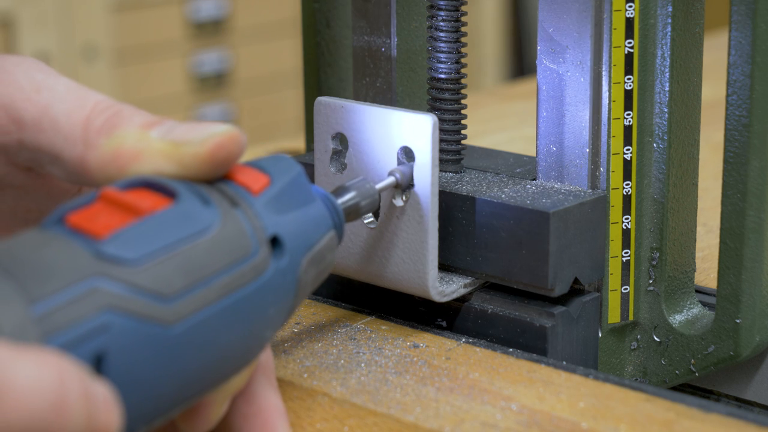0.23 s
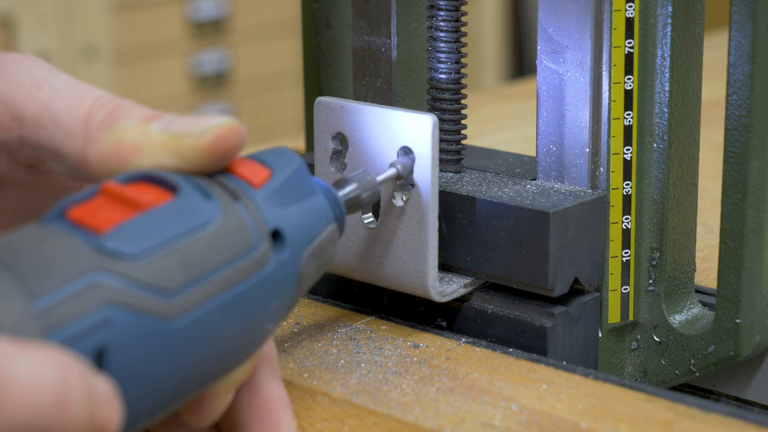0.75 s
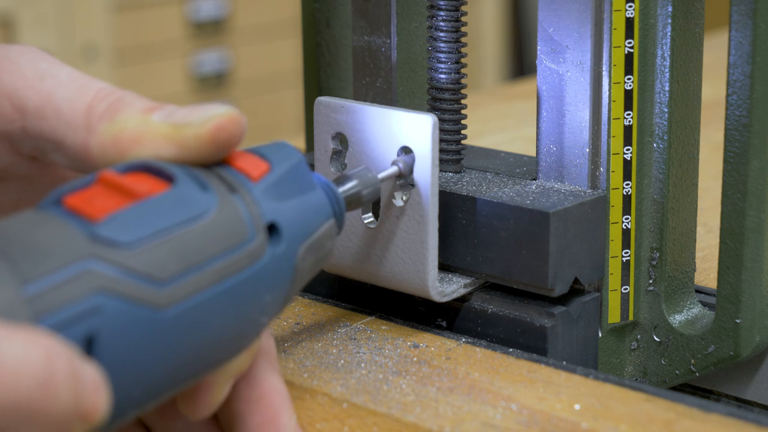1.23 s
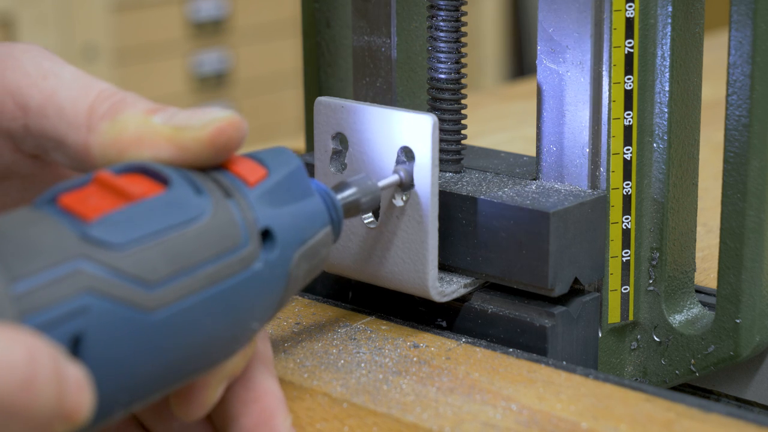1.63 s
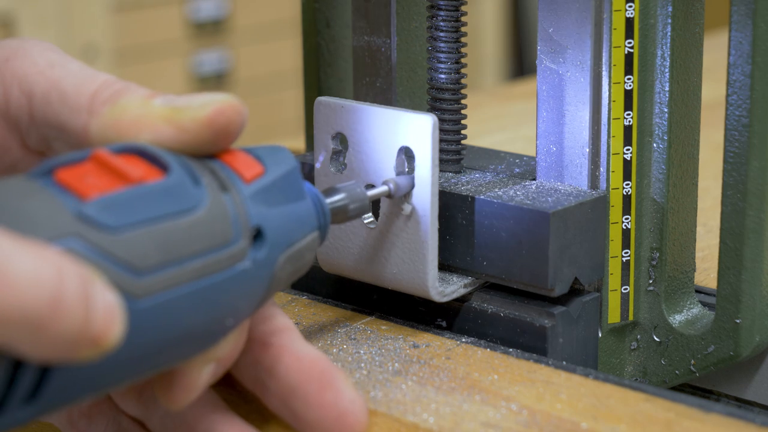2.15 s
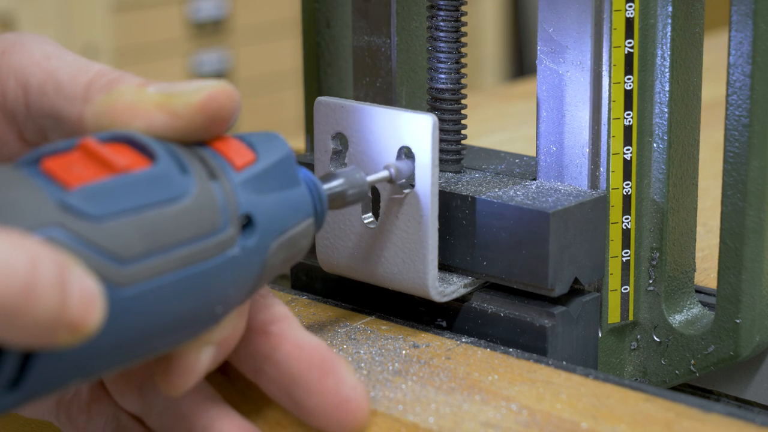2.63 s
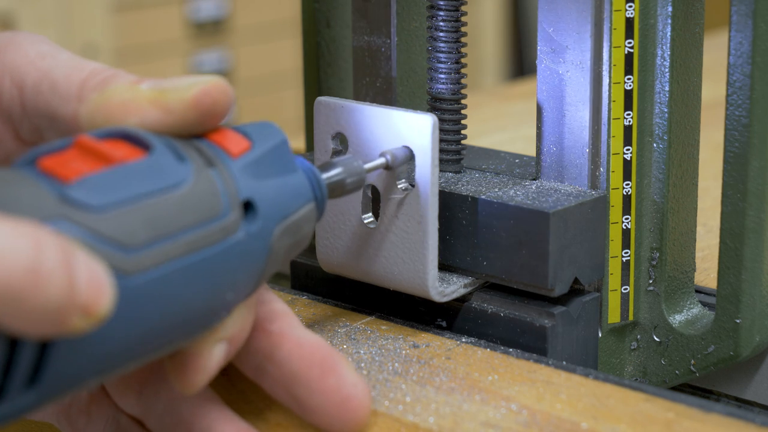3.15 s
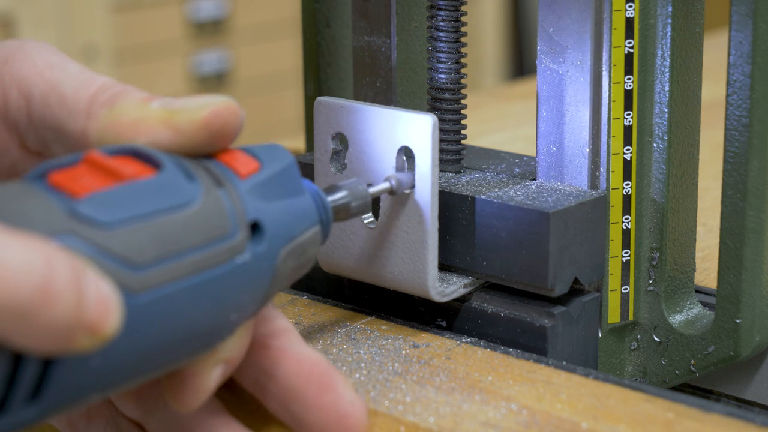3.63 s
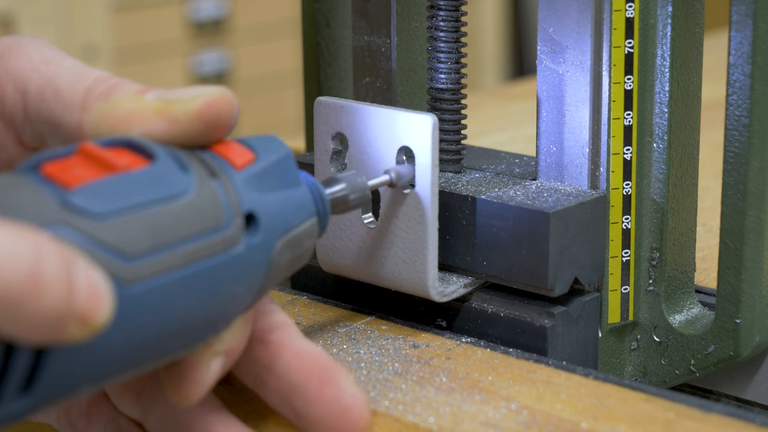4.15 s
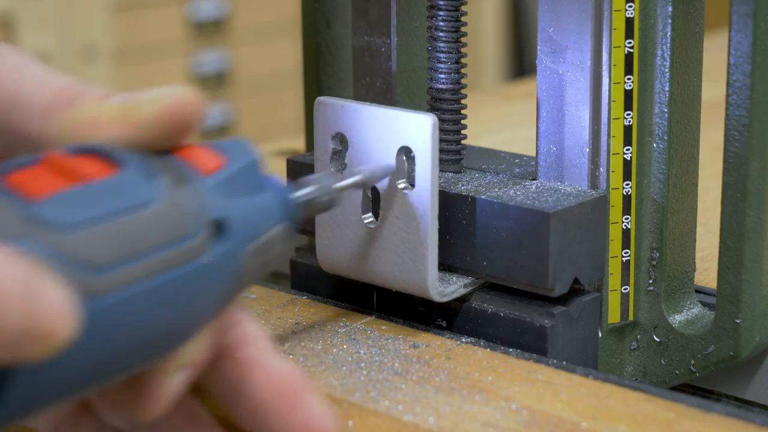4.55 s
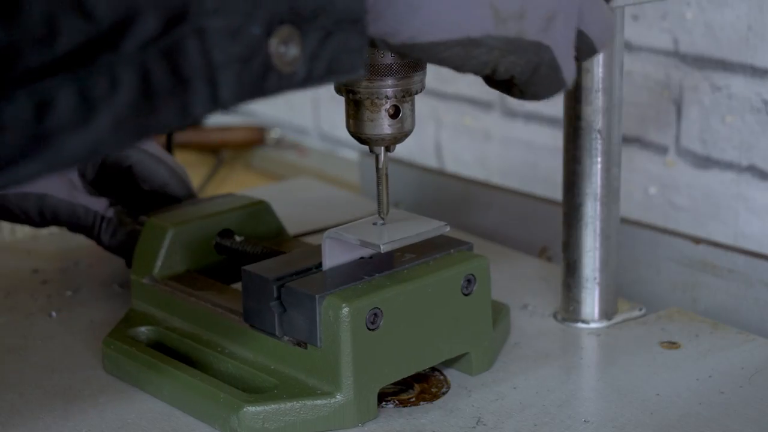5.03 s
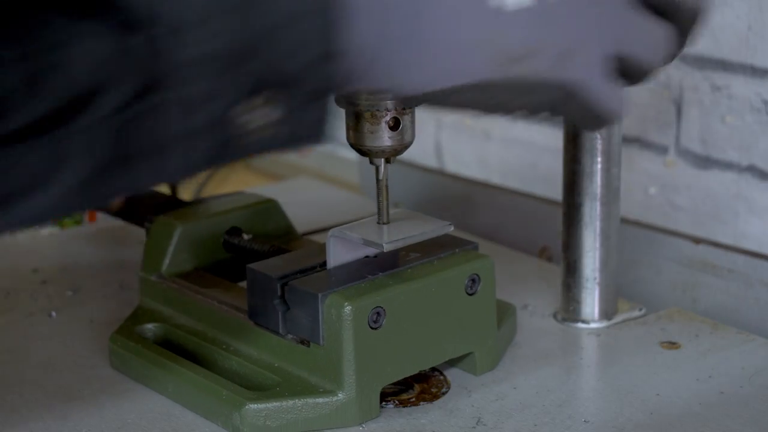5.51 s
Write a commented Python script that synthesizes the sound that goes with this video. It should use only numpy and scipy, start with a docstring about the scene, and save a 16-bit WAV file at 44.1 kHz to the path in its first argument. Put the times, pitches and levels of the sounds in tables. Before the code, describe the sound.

A small rotary tool whines and rasps inside a metal bracket, chattering and squealing, then cuts off to near silence with faint cloth rustle and ticks.

```python
"""A small cordless rotary tool widens a hole in a metal bracket clamped in a vice, close to the microphones.
From 0 s: one shaft speed drives tonal motor whine, fan noise, rasping chips, bracket chatter and squeals.
The motor sags under load; the burr lifts briefly at times; the grinding ends abruptly at 4.74 s.
Then, very quietly, sleeve and glove brush over a bench drill: filtered grit, knocks, faint squeaks, small ticks.
Quiet workshop air, shaped noise, lies under everything."""
import sys
import numpy as np
from scipy import signal
from scipy.fft import rfft, irfft
from scipy.io import wavfile

SR = 44100
rng = np.random.default_rng(int(sys.argv[2]) if len(sys.argv) > 2 else 0)


def generate_wav(sig):
    """Save sig (samples, or channels by samples) to the path in sys.argv[1] as 16-bit PCM at SR."""
    pcm = np.round(np.clip(np.atleast_2d(sig).T, -1, 1) * 32767).astype(np.int16)
    wavfile.write(sys.argv[1], SR, pcm)


N = 254898
T = np.arange(N) / SR
HZ = np.fft.rfftfreq(N, 1 / SR)
USUAL_HZ = 560  # reference shaft speed


def gain_of(db):
    """Decibels to amplitude."""
    return 10 ** (np.asarray(db) / 20)


def evened(x):
    """Scales to rms 1."""
    return x / np.sqrt(np.mean(x ** 2) + 1e-20)


def curves(rows):
    """Table columns, joined by straight lines in time."""
    s, *columns = np.transpose(rows)
    return [np.interp(T, s, c) for c in columns]


def shape(points):
    """Gain at every frequency from (f/Hz, level/dB) points."""
    hz, db = np.transpose(points)
    return gain_of(np.interp(np.log(HZ + 1), np.log(hz + 1), db))


def colour(x, gain):
    """Filters by a gain for every frequency."""
    return irfft(rfft(x) * gain, N)


def above(hz, order=8):
    """Gain of a steep high-pass."""
    ratio = (HZ / hz) ** order
    return ratio / np.sqrt(1 + ratio ** 2)


def mode(hz, width):
    """Response of one resonance, gain 1 at its top."""
    return 1j * HZ * width / (hz ** 2 - HZ ** 2 + 1j * HZ * width)


def noise():
    """White noise of nominal rms 1."""
    return rng.standard_normal(N)


def wander(hz):
    """Slow chance of rms 1, up to about hz changes a second."""
    return evened(colour(noise(), 1 / (1 + (HZ / hz) ** 2)))


def swell(start, end, fade):
    """A window in time with soft edges."""
    return np.sin(np.pi / 2 * np.clip(np.minimum(T - start, end - T) / fade, 0, 1))


def dying(start, decay_s):
    """A sudden start and an exponential decay."""
    return (T >= start) * np.exp(-np.maximum(T - start, 0) / decay_s)


def grit(per_s, spread_db):
    """Tiny random impulses of very unequal size, rms 1."""
    size = gain_of(spread_db * np.minimum(rng.exponential(1, N), 4))
    return evened(np.sign(noise()) * size * (rng.random(N) < per_s / SR))


def echoes(t60):
    """Response of sparse, dying reflections of energy 1."""
    taps = noise() * (rng.random(N) < 2000 / SR) * gain_of(-60 * T / t60)
    return rfft(taps / np.linalg.norm(taps))


def partial(turns, multiple, rough, width_hz):
    """One multiple of a rotation; the rough share of its power is smeared by uneven contact."""
    angle = 2 * np.pi * (multiple * turns + rng.random())
    rough = np.clip(rough, 0, 1)
    smeared = wander(width_hz) * np.cos(angle) + wander(width_hz) * np.sin(angle)
    return np.sqrt(2 * (1 - rough)) * np.cos(angle) + np.sqrt(rough) * smeared


# workshop air, relative spectrum: f/Hz, density/dB per Hz
AIR = [(60, -30), (280, -6.5), (600, -4), (1300, -13.5), (4000, -17.5), (9000, -25.5), (12000, -49.5)]


def air():
    """Steady shaped noise, the quiet air of the workshop."""
    return gain_of(-91.5) * evened(colour(noise(), shape(AIR)))


# abrupt pops: t/s, peak level/dB
POPS = [(1.94, -41), (4.74, -77)]


def pops():
    """Single one-sided pulses, each a step up and a very fast decay."""
    return sum(gain_of(db) * dying(s, decay_s=0.00018) for s, db in POPS)


# small metal ticks: t/s, approximate peak level/dB, low-pass f/Hz
TICKS = [(5.558, -59, 14000), (5.571, -53.5, 14000), (5.577, -66, 14000), (5.684, -76, 3490),
         (5.753, -70, 3940)]
# tick spectrum before low-pass: f/Hz, relative level/dB
TICK = [(600, -22), (1100, -12), (2100, 1), (4000, 3), (5300, -7), (8800, 1), (12000, -25), (15000, -60)]


def ticks():
    """Short decaying noise cracks, some bright and some dull."""
    out = 0
    for s, db, top_hz in TICKS:
        crack = evened(colour(noise(), shape(TICK) * (1 - above(top_hz, order=4))))
        out = out + gain_of(db - 12.5) * dying(s, decay_s=0.0051) * crack  # rms below peak
    return out


# strokes of sleeve and glove: start t/s, length/s, level/dB
STROKES = [(4.767, 0.12, -76), (4.896, 0.092, -67.5), (4.962, 0.12, -76), (5.068, 0.1, -86.5),
           (5.147, 0.093, -76.5), (5.317, 0.12, -72.5), (5.444, 0.072, -65.5), (5.56, 0.044, -73.5)]
STROKE_RISE_S, STROKE_FALL_S, SETTLE_DB, SETTLE_S, FOLDS_DB = 0.03, 0.03, -16, 0.092, -3
# soft knocks of the arm against the drill: t/s, level/dB before the rise and decay
KNOCKS = [(4.774, -68), (4.8, -65.5), (5.346, -61.5), (5.417, -58.5), (5.519, -60.5), (5.534, -69),
          (5.561, -75)]
KNOCK_RISE_S, KNOCK_DECAY_S = 0.0065, 0.019


def handling_levels():
    """Strokes rise, fade and let the cloth settle; folds bump along with them and at each knock."""
    power = 0
    for s, length, db in STROKES:
        stroke = np.clip(np.minimum((T - s) / STROKE_RISE_S, (s + length - T) / STROKE_FALL_S), 0, 1)
        settling = gain_of(SETTLE_DB) * dying(s + length / 2, SETTLE_S)
        power = power + (gain_of(db) * (stroke + settling)) ** 2
    knocks = sum(gain_of(db) * np.clip((T - s) / KNOCK_RISE_S, 0, 1) * dying(s, KNOCK_DECAY_S)
                 for s, db in KNOCKS)
    brushing = np.sqrt(power)
    return brushing, np.hypot(gain_of(FOLDS_DB) * brushing, knocks)


# feed lever squeaks: start t/s, end t/s, f/Hz, level/dB
SQUEAKS = [(4.771, 4.861, 1397, -79.5), (5.1, 5.167, 2630, -87)]


def lever_squeaks():
    """Faint squeaks of the feed lever: single tones, almost wholly smeared."""
    return sum(gain_of(db) * swell(start, end, fade=.025)
               * partial(hz * T, 0.99, rough=0.94, width_hz=48)  # sounds at 0.99 of the listed f
               for start, end, hz, db in SQUEAKS)


# cloth brushing spectrum: f/Hz, relative level/dB
BRUSH = [(250, -40), (560, 3), (900, -9), (1220, -12), (2700, -13), (4500, -26), (9000, -41), (13000, -72)]
# fold bump spectrum: f/Hz, relative level/dB
BUMP = [(60, -56), (130, -22), (275, 5), (400, -1), (600, -11), (1200, -58)]


def sleeve():
    """Cloth fibres catch and slip as grit through drill-head modes; folds bump softly, the lever squeaks."""
    brushing, bumping = handling_levels()
    housing = 1 + 3.5 * mode(1220, 70) + 0.99 * mode(1500, 80) + mode(2030, 90)
    brush = brushing * evened(colour(grit(per_s=2500, spread_db=1.0), shape(BRUSH) * housing))
    bump = bumping * evened(colour(grit(per_s=540, spread_db=1.0), shape(BUMP)))
    return (brush + bump + lever_squeaks()) * (T > 4.774)


# workshop reflections: f/Hz, level/dB re direct sound (mid adds 2 dB)
WIDTH = [(300, -31), (600, -36.5), (1100, -12.5), (2200, -10), (4500, -10), (8000, -14.5), (12000, -35)]


def bench(x):
    """The workshop answers each microphone differently; the bracket beams its upper middle to the left."""
    x = colour(x, above(150, order=3))  # small parts radiate no bass
    mid = x + colour(x, gain_of(2.0) * echoes(t60=0.35) * shape(WIDTH))
    side = colour(x, echoes(t60=0.6) * shape(WIDTH) + .17 * mode(4300, 1200).real)
    return np.array([mid + side, mid - side])


# shaft speed, sagging under hand pressure, recovering on lift: t/s, f/Hz
SPEED = [(0, 558.2), (.51, 518.6), (.79, 510.3), (.93, 556.8), (1.05, 538.4), (1.16, 535.3), (1.34, 595.3),
         (1.43, 608.2), (1.52, 560), (1.92, 551.3), (2.01, 534), (2.28, 534), (2.4, 565.9), (3.03, 572),
         (3.21, 606.6), (3.36, 564.4), (3.51, 586), (4.05, 584.7), (4.31, 603), (4.55, 547), (4.62, 587.7),
         (4.73, 609)]


def shaft_speed():
    """Shaft speed in Hz with a slight random waver."""
    return curves(SPEED)[0] * (1 + .002 * wander(25))


# free-running motor: multiple of shaft speed, mean level/dB at 600 Hz
MOTOR = [(3, -68.5), (4, -81), (5, -73.5), (7, -64), (9, -65.5), (12, -73), (15, -77), (21, -78)]
# bearing, between whole multiples: multiple of shaft speed, level/dB at 600 Hz
BEARING = [(2.11, -71.5), (5.11, -63.5), (7.11, -65)]
# cooling fan spectrum: f/Hz, relative density/dB per Hz
FAN = [(100, -44), (250, -34.5), (450, -28.5), (700, -13.5), (1400, -12.5), (2000, 1.5), (4300, -9.5),
       (5500, -19), (15500, -17.5)]
FAN_DB = -56.5  # at 600 Hz
WHINE_DB_PER_HZ, WHINE_ROUGH, WHINE_CLEARS_PER_HZ = 0.11, 0.49, 0.011  # louder, cleaner with speed


def motor(turns, speed, hum_db):
    """The unbalanced shaft hums with its octave; commutator and bearing whine, the fan blows with speed^4."""
    hum = gain_of(hum_db - 5.0) * partial(turns, 1, rough=0.17, width_hz=16)
    octave = gain_of(-72.0 + 5.9 * np.tanh(wander(5.0))) * partial(turns, 2, rough=0.051, width_hz=5.8)
    whine_rough = WHINE_ROUGH - WHINE_CLEARS_PER_HZ * (speed - USUAL_HZ)
    commutator = sum(gain_of(db + 3.2 * np.tanh(wander(5.7)))
                     * partial(turns, round(k), whine_rough, width_hz=12 * k) for k, db in MOTOR)
    bearing = sum(gain_of(db) * partial(turns, k, whine_rough, width_hz=35) for k, db in BEARING)
    whine = (commutator + bearing) * gain_of(WHINE_DB_PER_HZ * (speed - 600.0))
    fan = gain_of(FAN_DB) * evened(colour(noise(), shape(FAN)))
    return hum + octave + whine + fan * (speed / 600) ** 4


# chatter bouts, burr bouncing round the hole: start t/s, end t/s, nominal knock level/dB,
# hum level/dB (motor takes off 5), coarse scrape level/dB, bounces per turn
BOUTS = [(-.04, 0.107, -70, -84.5, -51, 1), (0.821, 0.968, -72.5, -64, -51.5, 0.84),
         (1.209, 1.302, -64, -58.5, -52.5, 0.91), (1.423, 1.619, -62.5, -66.5, -53, 0.91),
         (1.581, 1.956, -65.5, -53, -53, 0.94), (2.468, 2.802, -65.5, -59, -64.5, 1.0),
         (2.758, 3.1, -62, -63.5, -69, 0.9), (3.208, 3.323, -72.5, -69, -56.5, .9),
         (3.392, 3.552, -65, -70, -53.5, 0.96), (3.659, 4.32, -64, -59, -68, .83),
         (4.414, 4.569, -73.5, -64.5, -57.5, 0.99)]
BOUT_FADE_S, EVEN_BOUNCES = .04, 1
# between bouts: (nominal dB at usual speed, dB per Hz of sag)
CALM_KNOCK, CALM_HUM, CALM_SCRAPE = (-75, -0.09), (-65.5, -0.11), (-60, -0.012)


def shaking(sag_hz):
    """Hum, knock and scrape in dB, and bounces per turn: calm under pressure, bouts add in power."""
    knock, hum, scrape = (gain_of(db + per_hz * sag_hz)
                          for db, per_hz in (CALM_KNOCK, CALM_HUM, CALM_SCRAPE))
    per_turn = EVEN_BOUNCES
    for start, end, knock_db, hum_db, scrape_db, bounces_per_turn in BOUTS:
        on = swell(start, end, BOUT_FADE_S)
        knock = np.hypot(knock, on * gain_of(knock_db))
        hum = np.hypot(hum, on * gain_of(hum_db))
        scrape = np.hypot(scrape, on * gain_of(scrape_db))
        per_turn = per_turn + on * (bounces_per_turn - per_turn)
    return 20 * np.log10([hum, knock, scrape]), per_turn


def bounces(mean_rate):
    """The burr strikes the hole's wall about once a turn; the rate wavers, strong and weak blows alternate."""
    rate = mean_rate * (1 + .036 * wander(14) + .032 * wander(130))
    count = np.floor(np.cumsum(rate) / SR)
    alternation = 1 + .35 * np.tanh(wander(12)) * (-1) ** count
    force = gain_of(1.8 * noise() + 2.2 * wander(60)) * alternation
    return (np.diff(count, prepend=0) > 0) * force


# clamped bracket modes: f/Hz, width/Hz, relative level/dB
BRACKET = [(576, 170, -16.5), (677, 150, -5), (846, 30, 4.5), (1073.6, 7.4, 2.5), (1487, 140, -9.5),
           (2000, 96, -4), (3640, 160, -10.5)]


def chatter(hits, knock_db):
    """Bounces ring the bracket modes, less so when chatter is weak; scraping noise rings one broad mode."""
    body = sum(gain_of(db) * mode(hz, width) for hz, width, db in BRACKET)
    bouncing = 1 / (1 + gain_of(2 * (-65.0 - knock_db)))
    knocks = gain_of(8.5) * bouncing * evened(colour(hits, body * above(330)))
    ringing = gain_of(-1.5) * evened(colour(noise(), mode(1085.3, 79) ** 2))
    return gain_of(knock_db) * (knocks + ringing)


# squeals: start t/s, end t/s, multiple of shaft speed (rounded to halves), level/dB,
# second multiple (rounded to wholes), level/dB, left minus right/dB
SQUEALS = [(0.065, 0.489, 7, -48, 8, -55.5, 2.5), (0.443, 0.829, 10, -56.5, 15, -62.5, 5),
           (0.455, 0.747, 8, -65.5, 7, -72, 8), (0.715, 0.853, 7, -53, 8, -51.5, 4),
           (0.915, 1.205, 7, -49, 8, -56, 2.5), (1.964, 2.323, 8, -59.5, 10, -61, 6.5),
           (1.976, 2.28, 5, -58.5, 4, -67.5, -1), (2.263, 2.46, 7, -60.5, 8, -63.5, 8),
           (3.223, 3.431, 8, -57.5, 6, -59, 7), (3.234, 3.468, 1.5, -66.5, 4, -65, -1.5),
           (4.332, 4.48, 4, -54.5, 6, -55.5, 3), (4.327, 4.487, 8, -64, 9, -71, 9),
           (4.485, 4.587, 7, -50.5, 9, -52, 6)]
SQUEAL_OCTAVE_DB, SIDEBAND_DB, SIDEBAND_DB_PER_STEP = -15.5, -69.5, -1


def squeals(turns):
    """Stick-slip locks onto rotation: two fluttering tones in rough skirts, octave, sidebands a turn apart."""
    out = np.zeros((2, N))
    for start, end, multiple, db, second, second_db, pan_db in SQUEALS:
        k, k2 = round(2 * multiple) / 2, round(second)
        tones = 0
        for m, level in ((k, db), (k2, second_db)):
            core = .8 * partial(turns, m, rough=.15, width_hz=40)
            skirt = .6 * partial(turns, m, rough=1, width_hz=130)
            tones = tones + gain_of(level) * (core + skirt)
        octave = gain_of(db + SQUEAL_OCTAVE_DB) * partial(turns, 2 * k, rough=0.54, width_hz=53)
        once_a_turn = sum(2 * gain_of(SIDEBAND_DB + SIDEBAND_DB_PER_STEP * step)
                          * np.cos(2 * np.pi * (step * turns + rng.random()))
                          for step in range(1, 4) if k - step > 2)
        sidebands = once_a_turn * partial(turns, k, rough=0.24, width_hz=22)
        pan = gain_of([[pan_db / 2], [-pan_db / 2]])
        out += (tones + octave + sidebands) * swell(start, end, fade=0.039) * pan
    return colour(out, above(400, order=3))


# bite of the teeth, as fine-chip level before lifts: t/s, nominal level/dB
BITE = [(0.0, -54), (.45, -56), (.7, -51), (.9, -56), (1.5, -54.5), (1.9, -55.5), (1.97, -51.5),
        (2.25, -55), (2.42, -52.5), (3.05, -56.5), (3.25, -53), (4.25, -55), (4.4, -53), (4.73, -61.5)]
USUAL_BITE_DB = -55
# burr off the metal: start t/s, end t/s, drop of the fine chips/dB
LIFTS = [(1.255, 1.428, 4.5), (2.79, 2.851, 5), (3.089, 3.223, 9), (3.449, 3.531, 5.5),
         (4.104, 4.176, 10.5), (4.57, 4.804, 6.5)]
LIFT_FADE_S = 0.037
SCRAPE_OF_LIFT, RASP_OF_LIFT = 0.88, 0.68  # shares of a lift's drop
RASP_DB, RASP_OF_BITE, RASP_DB_PER_HZ = -55, 0.3, 0.013  # usual level, share of bite, rise with sag


def cut_levels(sag_hz, scrape_db):
    """Scrape, rasp and fizz in dB: pressure and bite add rasp; all three drop when the burr lifts."""
    bite_db = curves(BITE)[0]
    lift_db = sum(db * swell(start, end, LIFT_FADE_S) ** 2 for start, end, db in LIFTS)
    rasp_db = RASP_DB + RASP_OF_BITE * (bite_db - USUAL_BITE_DB) + RASP_DB_PER_HZ * sag_hz
    tremor_db = 1.0 * wander(29)  # the hand is never quite steady
    levels_db = [scrape_db - SCRAPE_OF_LIFT * lift_db, rasp_db - RASP_OF_LIFT * lift_db, bite_db - lift_db]
    return np.array(levels_db) + tremor_db


# scraping spectrum: f/Hz, relative level/dB
SCRAPE = [(700, -3.5), (1400, -11), (2000, -3), (3750, -4), (5130, -1), (6000, -9.5), (8500, -8.5),
          (10500, -15.5), (12600, -18.5), (14300, -16), (15700, -10.5)]
# burr and shank modes: f/Hz, width/Hz, relative level/dB
SHANK = [(7480, 210, -7.5), (9696, 400, -0.5), (9740, 54, 1), (11420, 400, -8)]


def cutting(turns, hits, knock_db, scrape_db, rasp_db, fizz_db):
    """Teeth tear off chips in a pattern partly repeating each turn; a bouncing burr cuts in bursts."""
    loose = np.clip((knock_db + 76.0) / 22, 0, .55)
    bursts = evened(signal.lfilter([1], [1, -np.exp(-1 / (0.00042 * SR))], np.sign(hits)))
    contact = np.sqrt(1 - loose + loose * bursts ** 2) * gain_of(np.tanh(wander(47)))
    # each multiple comes and goes as the burr finds new edges
    teeth = evened(sum(partial(turns, k, rough=.9, width_hz=22 + 4 * k) * gain_of(3 * np.tanh(wander(5)))
                       for k in range(2, 28)))
    chips = grit(per_s=30000, spread_db=2.1)
    regular = .42 - .45 * loose
    tearing = np.sqrt(1 - regular) * chips + np.sqrt(regular) * teeth
    drive = colour(tearing * contact, shape(SCRAPE))
    scrape = evened(colour(drive, above(1200, order=4) * (1 - above(4230))))
    rasp = evened(colour(drive, above(3780) * (1 - above(8500))))
    fizz = evened(colour(drive, above(9640)))
    rings = sum(gain_of(db) * mode(hz, width) ** 2 for hz, width, db in SHANK)
    shank = evened(colour(grit(per_s=18000, spread_db=6.0) * contact, rings))
    return (gain_of(scrape_db) * scrape + gain_of(rasp_db) * rasp
            + gain_of(fizz_db - 0.5) * fizz + gain_of(fizz_db - 3.5) * shank)


STOP_S = 4.741


def scene():
    """One shaft speed drives motor, cut, chatter and squeals; quiet handling follows."""
    speed = shaft_speed()
    sag_hz = USUAL_HZ - speed
    (hum_db, knock_db, scrape_db), per_turn = shaking(sag_hz)
    turns = np.cumsum(speed) / SR
    hits = bounces(speed * per_turn)
    cut = cutting(turns, hits, knock_db, *cut_levels(sag_hz, scrape_db))
    tool = motor(turns, speed, hum_db) + cut + chatter(hits, knock_db)
    running = np.clip((STOP_S - T) / .001, 0, 1)
    grinding = (bench(tool) + squeals(turns)) * running
    handling = colour(sleeve() + ticks(), 1 + gain_of(-4.0) * echoes(t60=0.2))
    return grinding + handling + air() + pops()


EDGE_HZ = 15850


def record(dry):
    """Band limit: a steep linear-phase low-pass."""
    low_pass = signal.firwin(511, EDGE_HZ, window=("kaiser", 9), fs=SR)
    return signal.oaconvolve(dry, low_pass[None], "same")


dry = scene()
out = record(dry)
generate_wav(out)
```